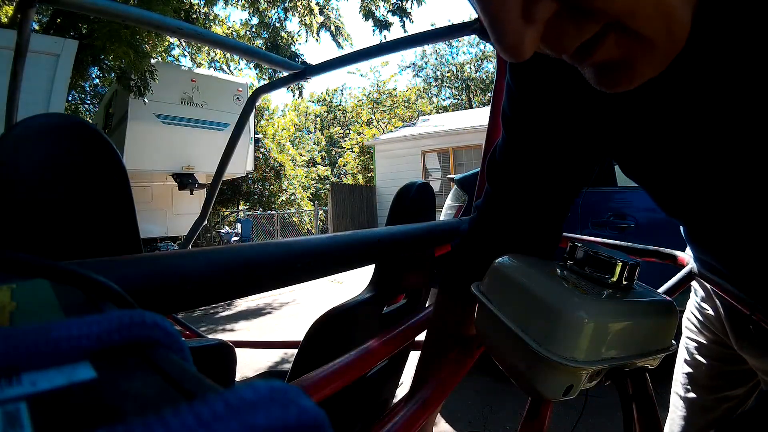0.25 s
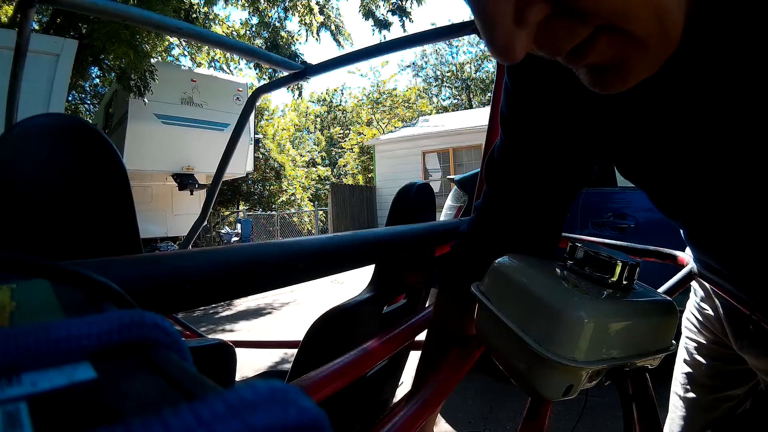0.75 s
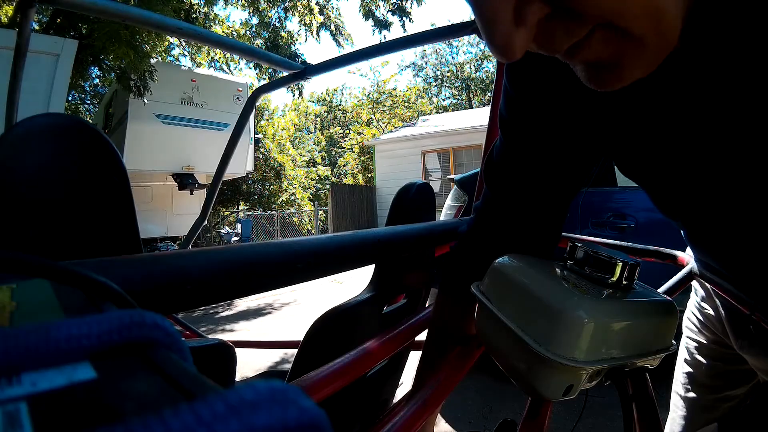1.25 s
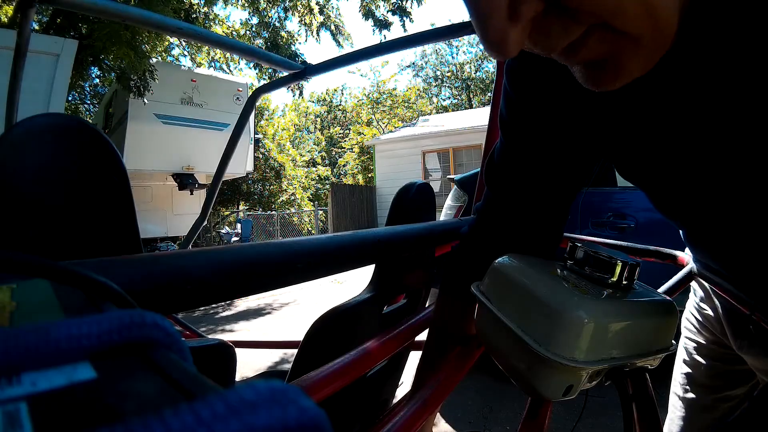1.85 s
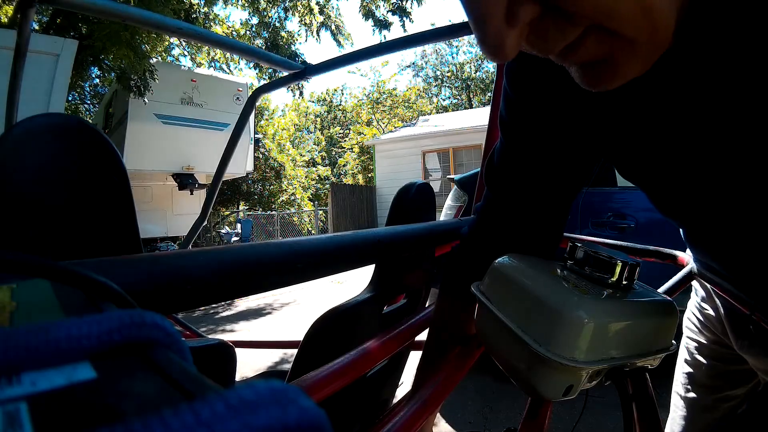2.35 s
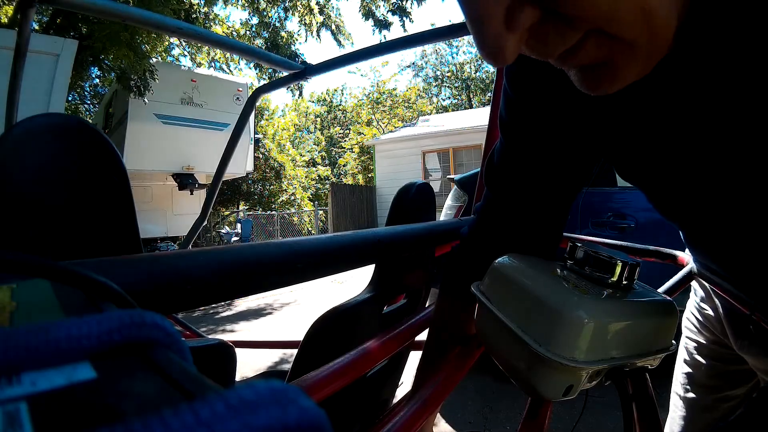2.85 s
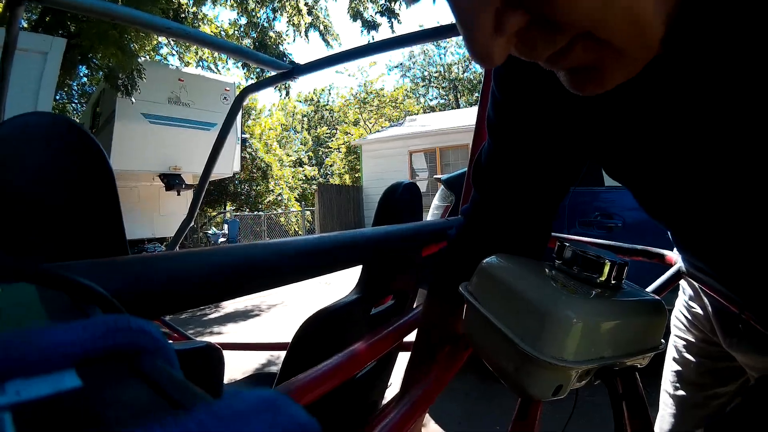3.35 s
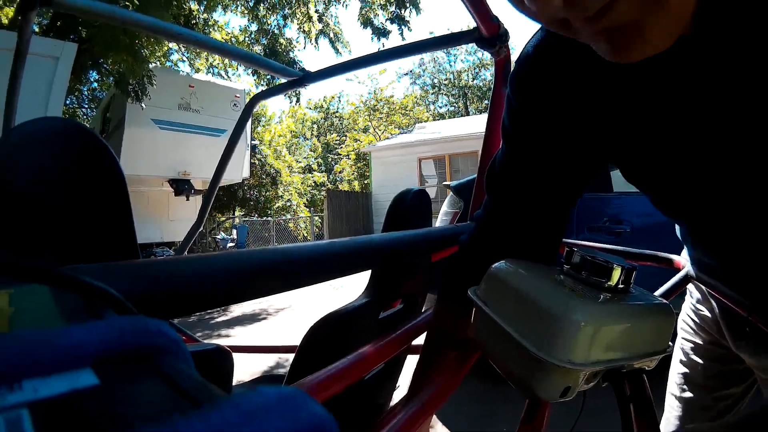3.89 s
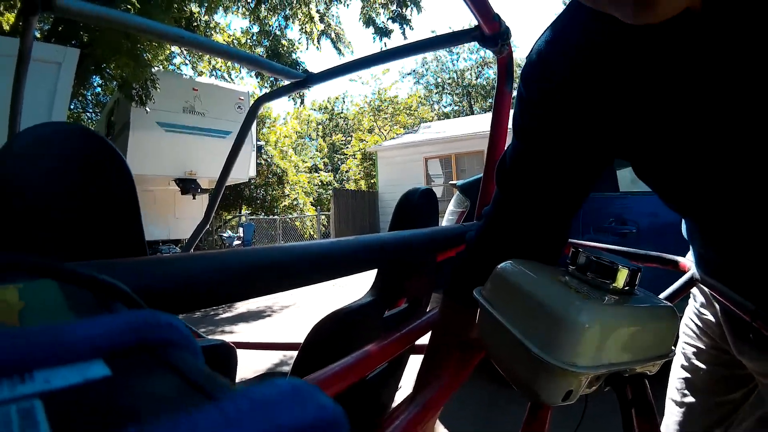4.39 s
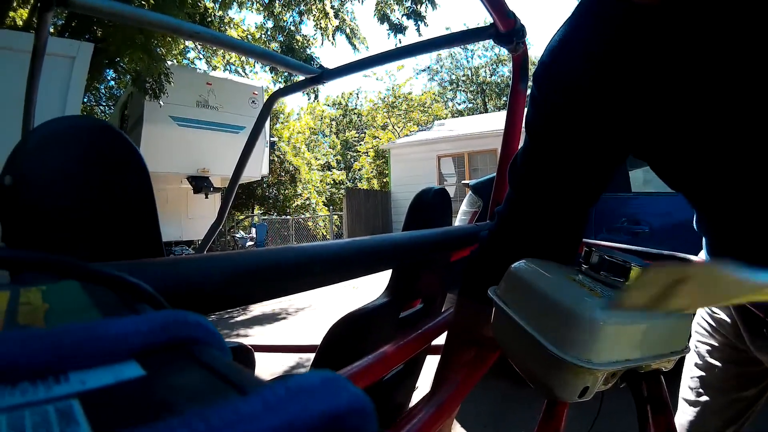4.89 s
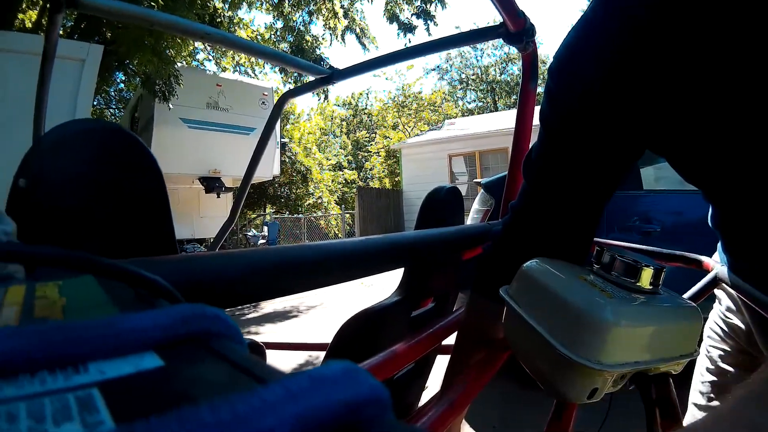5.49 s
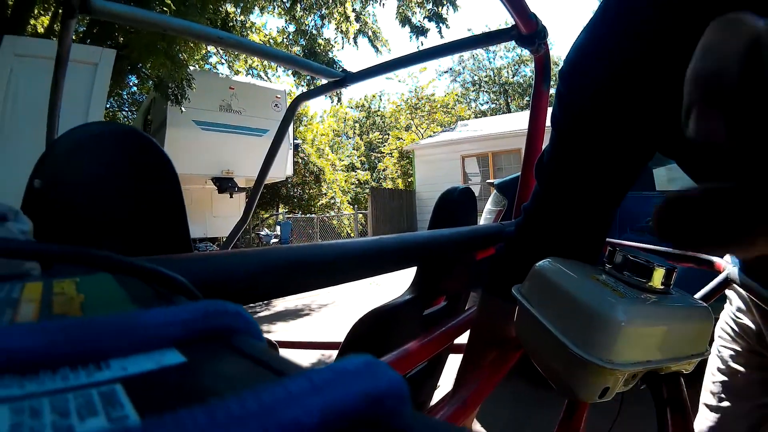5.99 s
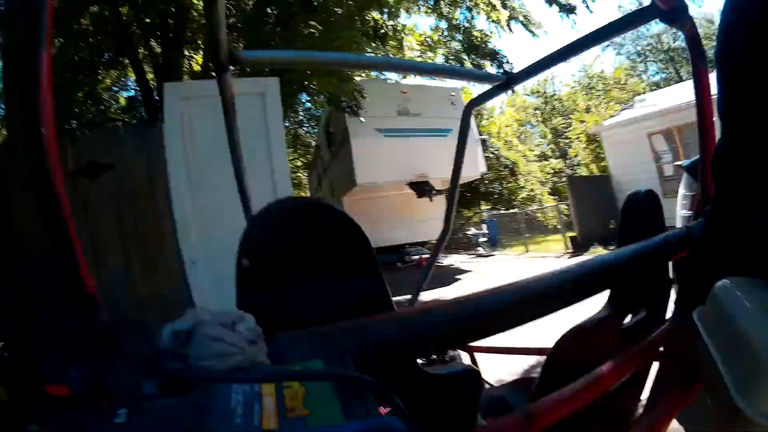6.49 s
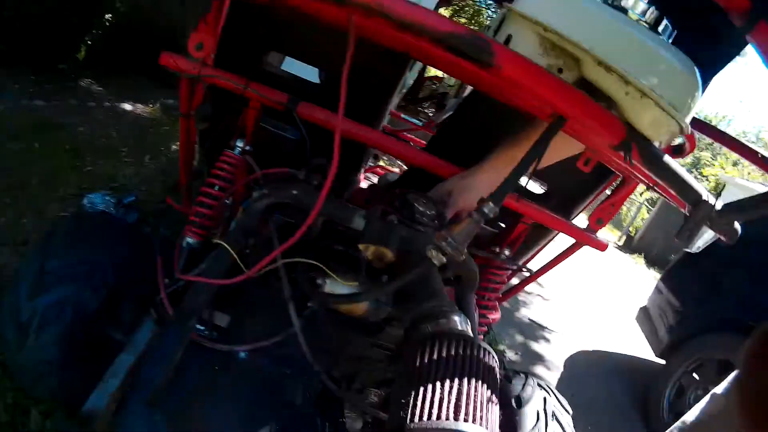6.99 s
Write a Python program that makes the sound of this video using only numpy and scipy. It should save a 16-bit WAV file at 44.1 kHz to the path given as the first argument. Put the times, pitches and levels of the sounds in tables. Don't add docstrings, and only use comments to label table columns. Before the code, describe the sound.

Two rasping starter bursts fail, with quiet pauses and faint ticks between them. The third cranks with a squealing gear whine, and uneven coughs turn into a running one-cylinder engine, about twenty muffled pops a second. Very close and dry, with only faint outdoor reflections; knocks through the frame clip the microphone. A tool clanks on a tube, then handling rubs as the microphone comes away and the idle sounds smoother and airier.

```python
import sys
import numpy as np
from scipy import signal
from scipy.fft import rfft, irfft
from scipy.io import wavfile
from scipy.ndimage import uniform_filter1d

SR = 44100
rng = np.random.default_rng(int(sys.argv[2]) if len(sys.argv) > 2 else 0)


def inscribe(sig):
    pcm = np.round(np.clip(np.atleast_2d(sig).T, -1, 1) * 32767)
    wavfile.write(sys.argv[1], SR, pcm.astype(np.int16))


def boost_factor(decibels):
    exponent = np.asarray(decibels, float) / 20
    return 10 ** exponent


N = 319284

# time in seconds, firings per second.
SPEED = [(3.44, 10.28), (3.58, 11.58), (3.77, 21.16), (3.85, 22.08), (4.04, 20.27), (4.51, 20.57),
         (4.6, 24.25), (4.96, 21.73), (5.58, 20.59), (6.63, 21.58), (6.95, 20.4), (7.24, 20.57)]
# time in seconds, unevenness from 0 to 1.
UNEVEN = [(3.4, .6), (4.5, .55), (4.9, .3), (6.3, .25), (6.45, .12), (7.24, .1)]
# time in seconds, load in dB.
LOAD = [(2.95, -5.5), (3.1, -6.5), (3.25, -3), (3.37, -7.5), (3.45, -5.5), (3.6, -5.5), (3.7, -0.5),
        (4.0, -0.5), (4.2, -1), (4.6, -0.5), (5.5, 0), (6.3, 0.26), (6.8, 1), (7.24, 1)]
LIFT_S = 6.32


def rms_one(x):
    return x / np.sqrt(np.mean(x ** 2) + 1e-20)


def in_time(rows, **ends):
    s, *columns = np.transpose(rows)
    return [np.interp(np.arange(N) / SR, s, c, **ends) for c in columns]


def colour(x, points):
    hz = np.maximum(np.fft.rfftfreq(N, 1 / SR), 1)
    point_hz, point_db = np.array(points).T
    gain = boost_factor(np.interp(np.log(hz), np.log(point_hz), point_db, left=-90, right=-90))
    return irfft(rfft(x) * rms_one(gain), N)


def filtered(x, order, hz, kind="low"):
    return signal.sosfilt(signal.butter(order, hz, kind, fs=SR, output="sos"), x)


def drift(rate):
    r = np.exp(-2 * np.pi * rate / SR)
    wander = signal.lfilter([1], [1, -2 * r, r * r], rng.standard_normal(N + SR))
    return rms_one(wander[SR:])


def ring(clicks, hz, t60):
    r, w = boost_factor(-60 / (t60 * SR)), 2 * np.pi * hz / SR
    return signal.lfilter([0, np.sin(w)], [1, -2 * r * np.cos(w), r * r], clicks + 1e-18)


def boost(x, hz, width_hz, db):
    r = np.exp(-np.pi * width_hz / SR)
    poles = [1, -2 * r * np.cos(2 * np.pi * hz / SR), r * r]
    return x + (boost_factor(db) - 1) * signal.lfilter([(1 - r * r) / 2, 0, (r * r - 1) / 2], poles, x)


def add(out, s, piece):
    i = max(round(s * SR), 0)
    out[i:i + len(piece)] += piece[:N - i]


def later(x, s):
    lag = max(round(s * SR), 1)
    return np.concatenate([np.zeros(lag), x[:-lag]])


def swell(length, tail=0.03):
    t = np.arange(2600) / SR / max(length, .001)
    return (2.1 * t * np.exp(1 - 2.47 * t)) ** 2 + tail * np.exp(-t * 0.66) * (1 - np.exp(-t * 4))


def strike(at, size, modes, spread_db):
    out, luck = np.zeros(N), rng.standard_normal((len(at), len(modes)))
    for k, (hz, db, t60) in enumerate(modes):
        clicks = np.zeros(N)
        clicks[at] = size(hz) * boost_factor(db + spread_db * luck[:, k])
        out += ring(clicks, hz, t60)
    return out


def squeal():
    # start in seconds, stall in seconds, first pitch in Hz, pitch before the sag in Hz,
    # share of the grind that is tone from 0 to 1.
    squeal_rows = [
        (0.293, 0.35, 1195, 1151, 0.01),
        (0.457, 0.614, 1460, 1432, 0.57),
        (2.776, 2.941, 1131, 1362, 0.58),
        (3.398, 3.438, 1750, 1675, 0.31),
    ]
    sag_s, stall_hz, fade_s = .042, 860, .012
    mesh, share = [], []
    for start, stall, first_hz, last_hz, part in squeal_rows:
        sag = max(stall - sag_s, start + 0.0027)
        fade = min(fade_s, (stall - start) / 3)
        mesh += [(start, first_hz), (sag, last_hz), (stall, stall_hz)]
        share += [(start, 0), (start + fade, part), (stall - fade, part), (stall, 0)]
    waver = 1 + .015 * drift(25)
    return in_time(mesh)[0] * waver, np.clip(in_time(share)[0], 0, .98)


def starter():
    # time in seconds, grind in dB.
    grind = [
        [(0, -29.5), (.08, -53), (.12, -63), (.16, -70)],
        [(.2, -62.5), (.225, -35.5), (.33, -23.5), (.36, -28), (.42, -20.5), (.62, -23), (.68, -29.5),
         (.82, -35), (.92, -68)],
        [(1.775, -55.5), (1.82, -29.5), (2.0, -30.5), (2.06, -40), (2.09, -30), (2.17, -29), (2.2, -27.5),
         (2.35, -37.5), (2.45, -77)],
        [(2.685, -72), (2.72, -31.5), (2.8, -18), (2.92, -15), (2.955, -40), (3.0, -36), (3.1, -21),
         (3.3, -23.5), (3.6, -36.5)],
    ]
    # time in seconds, peak in dB, length in seconds.
    bites = [(0.043, -23, 0.0086), (0.072, -26.5, 0.011), (0.249, -12.5, 0.033), (0.28, -12.5, 0.034),
             (0.307, -7.5, 0.017), (0.319, -7, 0.021), (0.462, -8, 0.018), (0.492, 1.5, 0.0083),
             (0.505, 3.5, 0.031), (0.567, 2, 0.022), (0.589, 4.5, 0.014), (1.834, -10.5, 0.032),
             (1.869, -10, 0.012), (1.892, -6.5, 0.019), (1.948, -13, 0.02), (1.962, -7.5, 0.015),
             (2.088, -11, 0.036), (2.113, -5, .021), (2.137, 0.5, 0.018), (2.157, -5.5, 0.013),
             (2.239, -13, 0.0044), (2.283, -15.5, 0.014), (2.744, -14.5, 0.01326), (2.759, -12, 0.021),
             (2.794, -8, .023), (2.871, -13, 0.0079), (2.899, -6, 0.0073), (2.906, -1.5, 0.01095),
             (2.923, 0, .011), (3.412, 3, 0.0117)]
    # multiple of the mesh pitch, level in dB.
    whine_orders = [(1, 0), (2, -15), (3, -19)]
    # frequency in Hz, level in dB per Hz.
    grind_colour = [(88, -46.5), (150, -22), (589, -16.5), (730, -5.5), (998, -14.5), (1210, -3),
                    (1760, -1), (2270, -18), (4320, -13.5), (5910, -28), (11000, -34), (16000, -61.5)]
    # frequency in Hz, width in Hz, boost in dB.
    housing = [(770, 49, 4), (921, 25, 9.5), (1720, 93, 4.5), (2640, 40, 12.5), (3290, 27, 7),
               (4095, 120, 5.5), (4720, 80, 4.5)]
    bite_hz, bite_scatter = 1740, 0.063

    effort, tones = np.zeros(N), np.zeros(N)
    for rows in grind:
        effort += boost_factor(in_time(rows, left=-120, right=-120)[0] + 2.33 * drift(29))
    mesh_hz, share = squeal()
    for (s, db, length), (turn, luck) in zip(bites, rng.random((len(bites), 2))):
        i = round(s * SR)
        if share[i + 200] > 0:
            hz = mesh_hz[i:i + 2600]
        else:
            hz = np.full(2600, bite_hz * (1 + bite_scatter * (2 * luck - 1)))
        tone = np.sin(2 * np.pi * (np.cumsum(hz) / SR + turn))
        add(effort, s - .003, boost_factor(db - 9.5) * swell(length))
        add(tones, s - .003, boost_factor(db - 5.0) * swell(length) * tone)

    phase = 2 * np.pi * np.cumsum(mesh_hz * (1 + .014 * drift(90))) / SR
    whine = 1.3 * sum(boost_factor(db + k * drift(70)) * np.sin(k * phase) for k, db in whine_orders)
    whine = boost(whine, 2780, 200, 6.7)
    whine = np.sqrt(share) * effort * boost_factor(3.6 * drift(27)) * whine

    white = rng.standard_normal(N)
    plain = colour(white, grind_colour)
    driven = colour(white * effort * np.sqrt(1 - share), grind_colour)
    for hz, width_hz, db in housing:
        plain, driven = boost(plain, hz, width_hz, db), boost(driven, hz, width_hz, db)

    rocking = rms_one(ring(drift(60), 45, 0.065))
    shudder = boost_factor(-44.5) * np.sqrt(uniform_filter1d(effort, 3000)) * (effort > 1e-4) * rocking
    return driven / np.std(plain) + whine + tones * (1 - share) + shudder


def exhaust(at, puff_db, bark_db, rough):
    # frequency in Hz, level in dB, t60 in seconds.
    pipe = [(460, -12, 0.055), (610, 0.5, 0.013), (685, 4, 0.015), (925, -9.5, 0.027), (1320, -4, 0.0057)]
    # delay in seconds, level in dB.
    pipe_echoes = [(.0054, -1), (.0158, -4.5)]
    puff_hz, puff_s = 192, 0.012

    t, gates = np.arange(round(puff_s * SR)) / SR, np.zeros(N)
    gates[at - 40] = boost_factor(puff_db + 2.8 * rough * rng.standard_normal(len(at)))
    pulse = np.sin(np.pi * t / puff_s) ** 2 * np.cos(2 * np.pi * puff_hz * (t - 0.635 * puff_s))
    puff = signal.oaconvolve(gates, pulse)[:N]

    bark = strike(at, lambda hz: boost_factor(bark_db), pipe, .6 + 6 * rough)
    bark = filtered(bark, 2, 1600)
    loose = np.clip(2.8 * in_time(UNEVEN)[0] - .6, 0, 1)
    bark = loose * bark + (1 - loose) * filtered(bark, 2, 430, "high")
    settled = 1.1 - .9 * loose
    echoes = settled * sum(boost_factor(db) * later(bark, s) for s, db in pipe_echoes)
    out = puff + boost_factor(-16) * later(puff, 0.012) + bark + echoes
    return filtered(out, 3, 80, "high")


def coughs():
    # time in seconds, puff in dB, bark in dB.
    cough_rows = [(.414, -24.5, -30), (0.653, -23, -23), (1.963, -30, -25.5), (2.218, -35, -47),
                  (2.985, -20, -15.5), (3.053, -22, -38), (3.104, -7, -26), (3.115, -38, -11),
                  (3.15, -13, -40), (3.172, -14, -10.5), (3.194, -26, -30), (3.219, -12, -19),
                  (3.264, -8.5, -13.5), (3.301, -16, -39), (3.438, -17, -7), (3.534, -20, -22)]
    # frequency in Hz, level in dB, t60 in seconds.
    kick = [(90, -1, .055), (360, 7, .03)]
    s, puff_db, bark_db = np.transpose(cough_rows)
    at = (s * SR).astype(int)
    jolt = strike(at, lambda hz: boost_factor(np.minimum(puff_db, -17)), kick, spread_db=3.5)
    return exhaust(at, puff_db, bark_db, rough=.1) + signal.lfilter([.03], [1, -.97], jolt)


def knocks():
    # time in seconds, peak in dB.
    knock_rows = [(3.092, -7.5), (3.176, -3), (3.417, -13), (3.602, -18), (3.681, -2), (3.7513, -7),
                  (3.8136, 1), (3.965, -13), (4.124, -19), (4.1456, 2), (4.172, -19), (4.2504, -2),
                  (4.487, -4.5), (4.5134, -9), (4.5432, -12), (4.561, -6.5), (4.6262, -2), (4.6471, -4),
                  (4.862, -5.5), (4.951, -11.5), (5.1616, 1.5), (5.233, 6.5), (5.8309, -4), (6.117, 1.5),
                  (6.211, -6), (6.2556, -4.5), (6.285, -9.5), (4.907, -11), (4.194, -1), (3.859, -13)]
    # time in seconds, peak in dB.
    tick_rows = [
        (0.842, -24.5),
        (1.1881, -39.5),
        (1.3243, -51),
        (1.7746, -21),
    ]
    # frequency in Hz, level in dB, t60 in seconds.
    frame = [(1750, 13.5, 0.0032), (2710, 12, 0.0016), (3830, 2.5, 0.003), (4400, 3.5, 0.0064),
             (6170, -70, 0.0018), (7000, -5, 0.0034), (9500, -4.5, 0.0027), (10440, -18.5, 0.0045)]
    chatter = np.zeros(N)
    for (s, db), noise in zip(knock_rows, rng.standard_normal((len(knock_rows), 2600))):
        add(chatter, s - .001, boost_factor(db - 13.0) * swell(0.0035, tail=0.016) * noise)
    for (s, db), noise in zip(tick_rows, rng.standard_normal((len(tick_rows), 2600))):
        add(chatter, s, boost_factor(db - 21.5) * swell(0.0031, tail=.03) * noise)
    ringing = sum(boost_factor(db) * ring(chatter, hz, t60) for hz, db, t60 in frame)
    return 0.4 * ringing + 0.36 * np.diff(chatter, prepend=0)


def cycles():
    return np.cumsum(in_time(SPEED, left=0)[0]) / SR - 0.0498


def level_db(layer):
    db, per_load, uneven_db, lifted_db = layer
    lifted = np.clip((np.arange(N) / SR - LIFT_S) / 0.02, 0, 1)
    return db + per_load * in_time(LOAD)[0] + uneven_db * in_time(UNEVEN)[0] + lifted_db * lifted


def valve_ticks(cycle):
    seats = np.flatnonzero(np.diff(np.floor(2 * cycle + .05)) > 0)
    luck = np.clip(rng.standard_normal(len(seats)), -2, 2)
    ticks = np.zeros(N)
    ticks[seats] = boost_factor(17.5 + 5.0 * luck - 6 * (seats > LIFT_S * SR))
    ticks = signal.lfilter([1], [1, -.985], ticks) * rng.standard_normal(N) * boost_factor(-20)
    return filtered(ticks, 2, [6500, 14000], "band")


def engine():
    # level in dB, dB per dB of load, dB when uneven, dB once lifted.
    puff_layer, bark_layer, rumble_layer = (-6, 3, -6, -1.5), (-5.5, 1, -5.5, -3.5), (-26, 1.9, 9.5, -9.5)
    rattle_layer, hiss_layer, shake_layer = (-20.5, 2, 0.5, 2), (-35.5, 0.82, 16.5, 6.5), (-41.5, 12.5, 17, -7.5)
    # frequency in Hz, level in dB per Hz.
    rumble_colour = [(60, -10), (100, -2.5), (190, 3.5), (320, -1), (500, -2), (800, -14), (1100, -9)]
    rattle_colour = [(200, -40), (400, -9), (700, 2.5), (1000, 0.5), (1400, 1), (1800, -2.5), (2400, -16),
                     (3200, -27.5), (4200, -34)]
    hiss_colour = [(1180, -42), (2000, 1), (2460, -1), (2760, 2.5), (3170, -7.5), (4120, -2), (6040, -14.5),
                   (10600, -17), (12700, -30.5), (14500, -42), (16000, -47)]

    rough = in_time(UNEVEN)[0]
    on = np.clip((np.arange(N) / SR - LOAD[0][0]) / 0.032, 0, 1)
    cycle = cycles()
    running = np.arange(N) > SPEED[0][0] * SR
    fired = np.flatnonzero(np.diff(np.floor(cycle + .1 + .02 * rough * drift(15))) > 0)
    fired = np.concatenate([[round(SPEED[0][0] * SR) - 60], fired])
    pops = exhaust(fired, level_db(puff_layer)[fired], level_db(bark_layer)[fired], rough[fired])

    beat = np.exp(3.6 * (np.cos(2 * np.pi * (cycle - .03)) - 1)) * running
    off_beat = np.exp(31.0 * (np.cos(2 * np.pi * (cycle - .56)) - 1)) * running
    rumble_db = 1.0 * beat + 6.6 * off_beat + 1.1 * drift(25)
    rumble = colour(rng.standard_normal(N) * boost_factor(rumble_db), rumble_colour)
    rattle_db = (2.5 + 10 * rough) * beat + 8 * rough * off_beat + 1.6 * drift(60)
    rattle = colour(rng.standard_normal(N) * boost_factor(rattle_db), rattle_colour)
    taps = (rng.random(N) < 400 / SR) * rng.standard_normal(N) * 4.7
    hiss_db = 2.2 * beat + 2.1 * off_beat + 3.03 * drift(63)
    hiss = colour((rng.standard_normal(N) + taps) * boost_factor(hiss_db), hiss_colour) + valve_ticks(cycle)
    shake = np.sqrt(2) * np.sin(4 * np.pi * cycle + .5) * running
    shake = shake + .15 * rms_one(ring(drift(50), 45.34, .1))

    body = boost_factor(level_db(rumble_layer)) * rumble + boost_factor(level_db(rattle_layer)) * rattle
    body = body + boost_factor(level_db(hiss_layer)) * hiss + boost_factor(level_db(shake_layer)) * shake
    return pops + on * body


def thumps():
    # frequency in Hz, level in dB, t60 in seconds.
    thump_modes = [(170, -8, .012), (300, -8, .01), (560, -6, .008), (900, -6, .007), (1400, -8, .006),
                   (2000, -12, .005)]
    count = np.arange(1, 60)
    luck = np.clip(rng.standard_normal((len(count), 2)), -2, 1.5)
    rough = in_time(UNEVEN)[0][np.searchsorted(cycles(), count)]
    at = np.searchsorted(cycles(), count + .47 + .16 * rough * luck[:, 0])
    db = -15 + 26.5 * rough + in_time(LOAD)[0][at] + 5 * luck[:, 1]
    blows = strike(at, lambda hz: -boost_factor(db) * (at < LIFT_S * SR), thump_modes, spread_db=2.5)
    blows = blows + boost_factor(-6.5) * later(blows, 0.00247)
    return filtered(blows, 3, 110, "high")


def clank():
    # frequency in Hz, level in dB, t60 in seconds.
    tube = [(2540, -6, 0.042), (2920, -8, .06), (3240, -10.5, 0.055), (3530, -5.5, .06), (3790, -9, 0.031),
            (4700, -9, 0.022), (5130, -11, 0.044), (5550, -10, 0.064), (6200, -6, 0.027),
            (6940, -13, 0.024), (8960, -21, 0.16), (9500, -24, 0.13), (10100, -19, .1)]
    crack = np.zeros(N)
    burst = np.exp(-np.arange(600) / SR / 0.0022) * rng.standard_normal(600)
    add(crack, 5.243, boost_factor(-10) * burst)
    return .5 * crack + 0.19 * sum(boost_factor(db) * ring(crack, hz, min(t60, .15)) for hz, db, t60 in tube)


def scuffs():
    # time in seconds, peak in dB, centre in Hz, width in Hz, length in seconds.
    scuff_rows = [
        (6.338, -28, 10200, 3100, .05),
        (6.403, -15, 4100, 1600, .02),
        (6.903, -18, 6500, 8000, .015),
        (6.399, -11, 9600, 4500, .003),
        (6.966, -15, 1350, 700, .03),
        (6.976, -27, 8000, 7000, .018),
        (7.074, -29, 9000, 8000, .022),
        (7.169, -30, 9500, 8000, .012),
    ]
    out = np.zeros(N)
    for (s, db, hz, width_hz, length), noise in zip(scuff_rows, rng.standard_normal((len(scuff_rows), 2600))):
        edges = np.clip([hz - width_hz / 2, hz + width_hz / 2], 100, 20000)
        band = filtered(noise, 2, edges, "band")
        add(out, s, boost_factor(db) * swell(length, tail=0) * rms_one(band))
    return out


def scene():
    # frequency in Hz, level in dB per Hz.
    yard_colour = [(15, -33.5), (25, -0.5), (44, -6), (101, 3), (140, -8), (152, -10.5), (433, -11.5),
                   (1240, -19.5), (3720, -31.5), (14300, -31.5), (15500, -33)]
    kart = starter() + engine() + coughs() + thumps() + knocks() + scuffs() + clank()
    dull = signal.lfilter([.3], [1, -.7], kart)
    echoes = boost_factor(-22.0) * later(dull, 0.027) + boost_factor(-27) * later(dull, 0.049)
    yard = boost_factor(-57.5 + 0.52 * drift(4)) * colour(rng.standard_normal(N), yard_colour)
    return (kart + echoes + yard)[None]


def low_pass(x):
    return signal.sosfilt(signal.butter(12, 16810, fs=SR, output="sos"), x)


def record(dry):
    clip_top, cutoff_hz = 0.75, 16800
    flat = dry / (1 + np.abs(dry / clip_top) ** 16) ** (1 / 16)
    finished = signal.sosfilt(signal.cheby2(10, 60, cutoff_hz, fs=SR, output="sos"), flat)
    return low_pass(finished)


dry = scene()
out = record(dry)
inscribe(out)
```